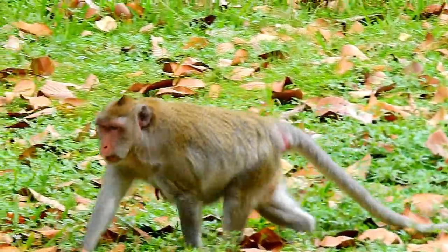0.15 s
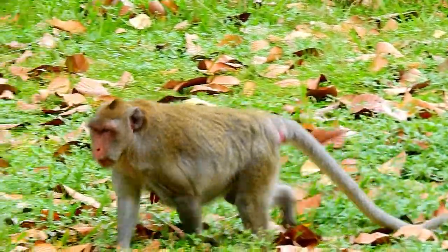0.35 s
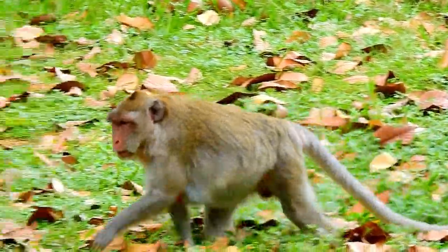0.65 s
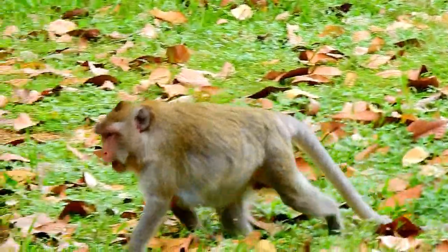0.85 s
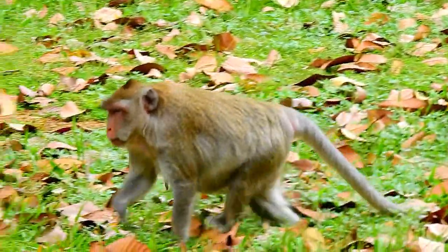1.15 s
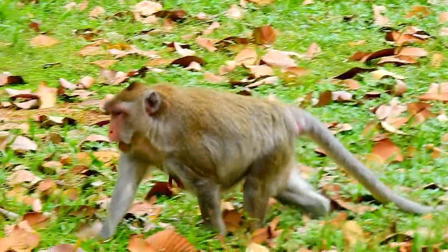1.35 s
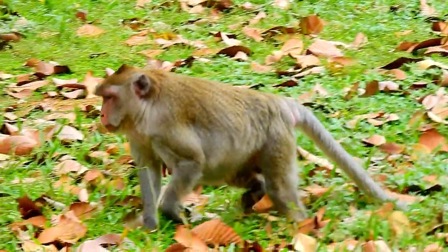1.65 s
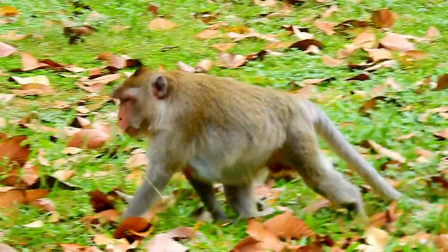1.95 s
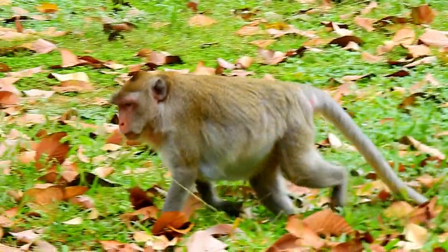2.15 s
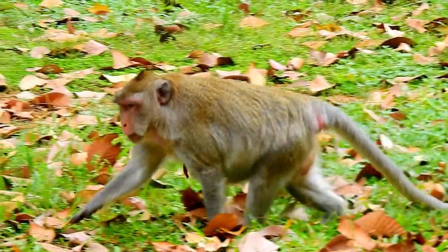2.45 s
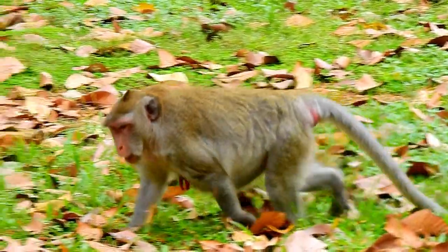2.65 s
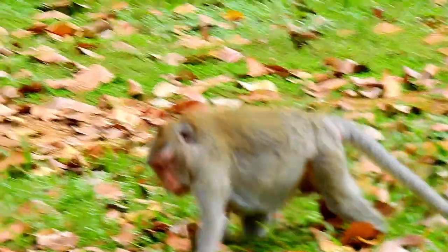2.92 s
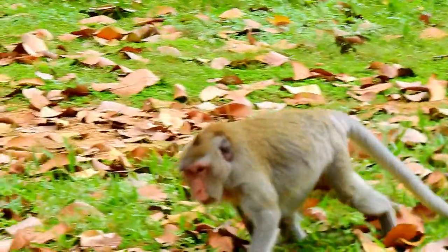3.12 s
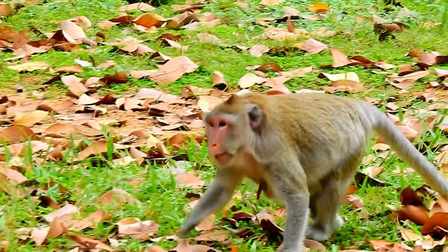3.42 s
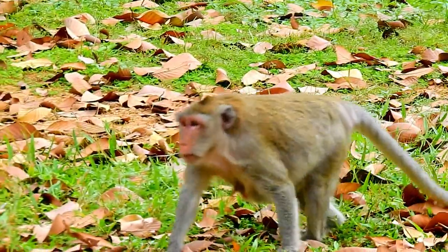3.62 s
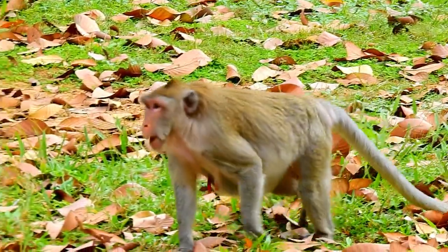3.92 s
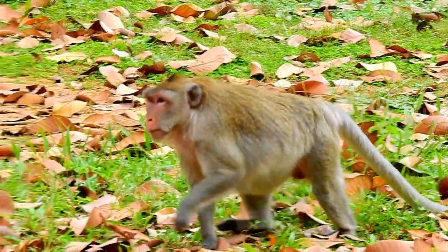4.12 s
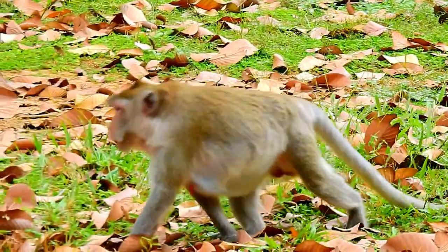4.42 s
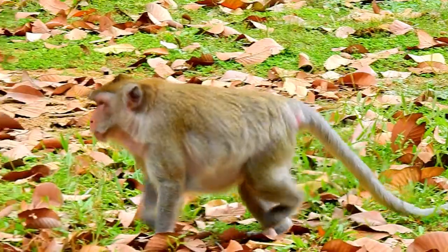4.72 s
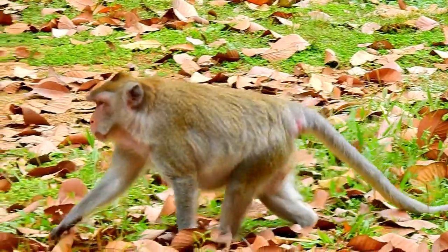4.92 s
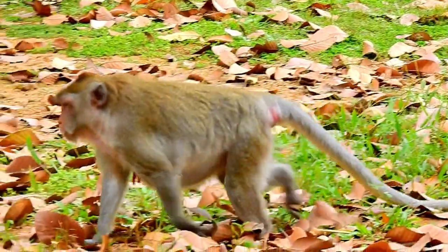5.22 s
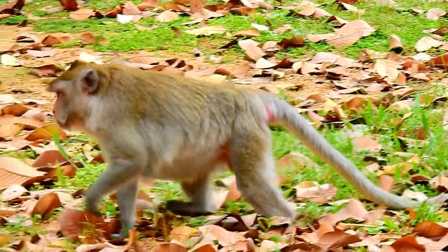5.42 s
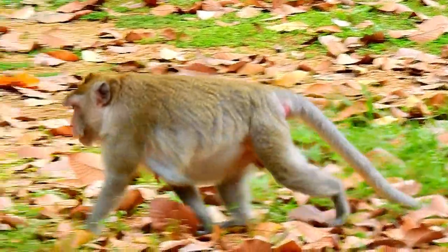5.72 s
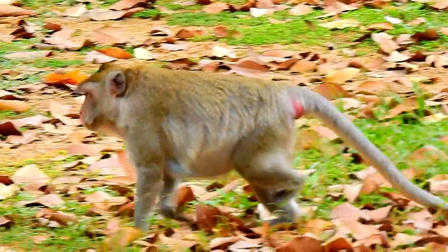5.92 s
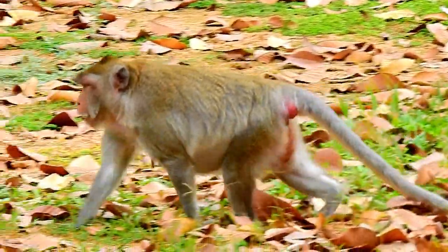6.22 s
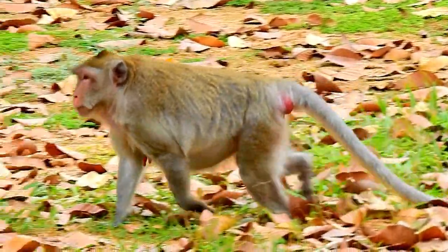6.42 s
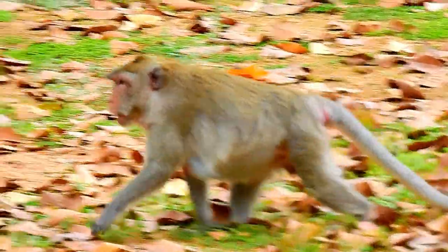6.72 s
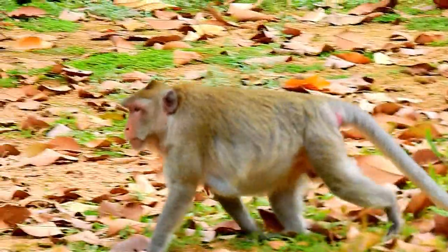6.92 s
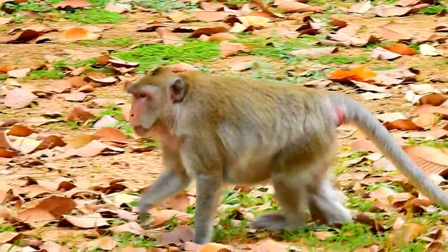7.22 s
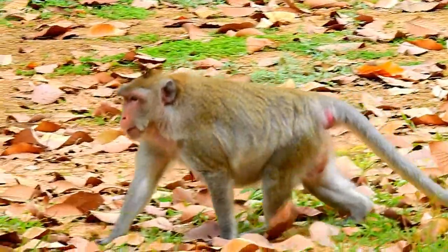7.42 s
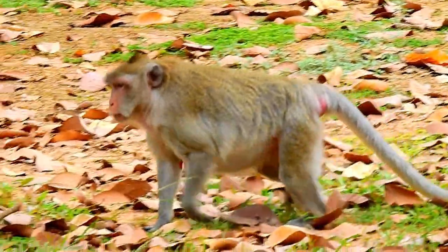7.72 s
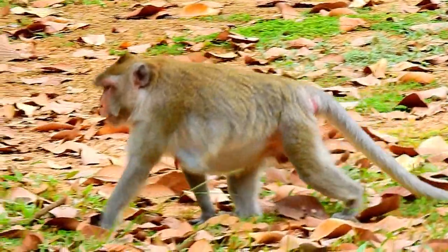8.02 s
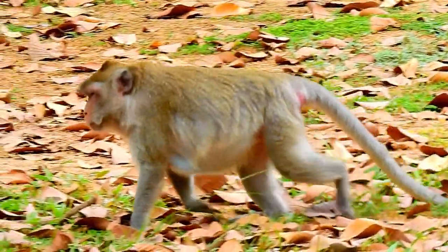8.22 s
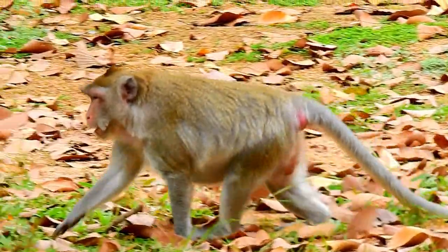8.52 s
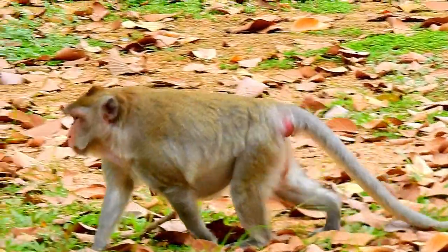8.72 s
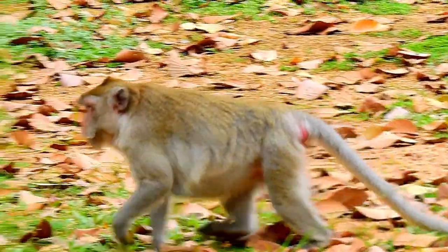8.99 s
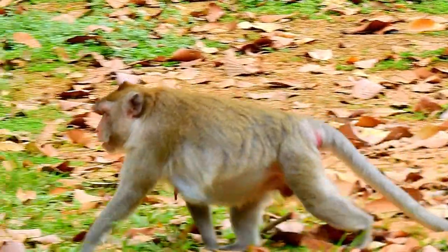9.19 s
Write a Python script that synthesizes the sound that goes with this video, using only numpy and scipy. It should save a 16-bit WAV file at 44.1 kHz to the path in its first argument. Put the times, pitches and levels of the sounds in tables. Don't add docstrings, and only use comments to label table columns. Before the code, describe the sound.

Short high animal calls and a hoarse chattering crowd ring among trees, leaving one spaced far caller before a small puttering motor passes by.

```python
import sys
import numpy as np
from scipy import signal
from scipy.fft import rfft, irfft, next_fast_len
from scipy.io import wavfile
from scipy.ndimage import uniform_filter1d

SR = 44100
rng = np.random.default_rng(int(sys.argv[2]) if len(sys.argv) > 2 else 0)


def volts(x):
    e = np.asarray(x, float) / 20
    return 10 ** e


def wav_record(signal):
    frames = np.transpose(np.atleast_2d(signal))
    bounded = np.clip(frames, -1, 1)
    quanta = np.round(bounded * 32767).astype(np.int16)
    wavfile.write(sys.argv[1], SR, quanta)


N = 412335

# pitch in Hz, level in dB per Hz.
AIR_SPECTRUM = [(15, -32), (25, -24), (54, -18), (102, -7), (183, -12), (265, -18), (709, -19.5),
                (907, -15), (2040, -14), (2810, -22), (3780, -19), (5200, -20.5), (8940, -36.5),
                (11600, -75), (19700, -120)]
# pitch in Hz, likeness from -1 to 1.
AIR_LIKENESS = [(60, 1), (210, 1), (710, 1), (2460, 0.78), (8490, 0.12)]
# pitch in Hz, left minus right in dB.
AIR_BALANCE = [(60, -1), (210, 0.5), (710, 2), (2460, 4.5), (8490, 1)]
# time in seconds, level in dB.
TRAFFIC_LEVEL = [
    (0, -91.5),
    (.7, -83),
    (3, -80),
    (3.3, -78),
    (4.3, -80),
    (4.7, -73),
    (5, -76.5),
    (5.8, -84),
    (6.5, -87),
]
# time in seconds, level in dB.
GUSTS = [(0, 0.5), (4.3, 2), (4.598, -1.5), (4.95, -12), (5.2, 1), (5.35, -8), (5.552, 0), (5.7, -5.5),
         (6.0, -3), (6.35, -4), (7, 2), (9.35, 7)]
LEAVES_DB, TRAFFIC_TOP_HZ = -80, 1100

# start in seconds, length in seconds, effort in dB,
# place of the peak from 0 to 1.
NEAR_CALLS = [
    [(.258, 0.22, -39.5, 0.55), (.715, 0.23, -29, 0.19), (1.13, 0.2, -35, 0.3)],
    [(.452, 0.082, -35, 0.4), (.52, .072, -32.5, 0.45), (.59, 0.15, -38.5, 0.54)],
    [(1.41, 0.23, -37, 0.21), (1.75, 0.22, -33.5, 0), (2.08, 0.17, -37, 0.34), (2.265, 0.23, -41, 1),
     (2.44, 0.2, -47, 0.2)],
    [(2.78, .32, -45.5, 0.38), (3.105, .26, -34.5, 0.37), (3.51, 0.28, -36, 0.33), (3.94, 0.24, -39, 0.59),
     (4.41, 0.23, -44.5, 0.15)],
    [(6.423, 0.275, -43, 0.4)],
]
# low partials in dB, left minus right in dB, echo in dB,
# mouth resonance in Hz, its strength in dB.
NEAR_VOICES = [(2, -16, -10.5, 6030, 3.5), (-2, -16, -6, 6150, 3.5), (4, -31.5, -28, 4740, 9),
               (0.5, -21.5, -6, 4420, -9), (3.5, 19, -2.5, 8300, 5.5)]
NEAR_WEAK_DB = [-6, -3, -16, -15, -12]
NEAR_STARTS_DB = [-14.5, -7.5, -6, -10.5, -5.5]
NEAR_ENDS_DB = [-8, -8, -4, -5.5, -4.5]
NEAR_ROUGHNESS = [
    [.45, .3, .45],
    [.3, .28, .42],
    [.15, .15, .15, .4, .4],
    [.55, .26, .28, .28, .3],
    [.26],
]
# time in seconds, pitch in Hz.
FIRST_PITCH = [
    [(0.27, 756), (0.302, 820), (0.314, 862), (0.36, 861), (0.392, 852), (0.432, 868), (0.44, 874),
     (0.46, 862.5)],
    [(0.725, 739.1), (0.759, 839), (0.791, 797.6), (0.803, 839), (0.819, 802), (0.861, 856), (0.887, 790),
     (0.91, 800)],
    [(1.14, 848), (1.202, 865.8), (1.208, 887), (1.268, 835), (1.28, 885), (1.3, 853), (1.312, 807),
     (1.34, 800)],
]
SECOND_PITCH = [
    [(0.46, 777), (0.478, 873), (0.51, 846.9), (0.52, 863), (0.535, 830)],
    [(0.525, 846), (0.535, 832.7), (0.543, 845), (0.557, 897), (0.585, 756)],
    [(0.6, 834), (0.624, 878), (0.634, 855), (0.702, 858), (0.72, 853)],
]
THIRD_PITCH = [
    [(1.42, 725.3), (1.452, 854.5), (1.46, 866.9), (1.486, 877), (1.502, 855), (1.55, 878), (1.585, 811)],
    [(1.76, 799.4), (1.774, 803), (1.79, 864), (1.854, 857), (1.864, 882), (1.904, 808), (1.92, 856)],
    [(2.09, 782), (2.13, 871), (2.164, 828), (2.178, 868), (2.21, 840), (2.222, 859), (2.23, 840)],
    [(2.28, 782), (2.32, 881.8), (2.352, 908), (2.37, 870), (2.402, 857.3), (2.444, 905), (2.46, 886)],
    [(2.45, 892.5), (2.47, 836), (2.542, 844.3), (2.584, 798), (2.598, 830), (2.616, 786), (2.63, 790)],
]
FOURTH_PITCH = [
    [(2.79, 699), (2.828, 824), (2.836, 836), (2.848, 808), (2.928, 826), (2.946, 802), (2.96, 809.5),
     (3.066, 795), (3.1, 750)],
    [(3.12, 695), (3.144, 717), (3.18, 790), (3.234, 806), (3.242, 790.0), (3.27, 815), (3.316, 783),
     (3.336, 709), (3.35, 690)],
    [(3.52, 689), (3.53, 676.6), (3.586, 747), (3.61, 799.5), (3.632, 761), (3.662, 799), (3.718, 816),
     (3.764, 671), (3.78, 682.5)],
    [(3.95, 635), (3.956, 627), (3.97, 702), (4.024, 775.5), (4.05, 754), (4.068, 783), (4.132, 753),
     (4.152, 715), (4.17, 684)],
    [(4.41, 681), (4.466, 758), (4.488, 747), (4.518, 763.1), (4.548, 762), (4.57, 767), (4.59, 724),
     (4.614, 708), (4.63, 660)],
]
FIFTH_PITCH = [
    [(6.43, 774), (6.444, 804), (6.51, 913), (6.53, 902), (6.6, 911), (6.658, 831), (6.688, 760),
     (6.7, 737.0)],
]
NEAR_QUIVER, NEAR_BEND = .002, 1.32
ROUGH_ENDS = .17

# pitch in Hz, level in dB.
THROAT_COLOUR = [(700, -24.5), (1600, -6), (2500, 2), (2900, -6.5), (3350, -1), (3680, 1), (3880, 4.5),
                 (4200, -5), (5100, -1.5), (5800, -4), (6600, -2), (7800, -10), (9000, -19), (10000, -19)]
NEAR_TOP_DB, FAR_TOP_DB = -11.5, -2
NEAR_AIR_DB, FAR_AIR_DB, CROWD_AIR_DB = -23, -45, -44

# time in seconds, effort in dB.
CROWD_EFFORT = [(.7, -27), (.8, -43), (.95, -40), (1.1, -41), (1.2, -35), (1.3, -37), (1.44, -39.5),
                (1.58, -39.5), (1.7, -36.5), (1.85, -34.5), (1.95, -43), (2.05, -41.5), (2.25, -43.5),
                (2.4, -42), (2.57, -40.5), (2.701, -66)]
# pitch in Hz, calls a second, left minus right in dB.
CROWD_VOICES = [(849, 3.1, -18.5), (929, 2.6, 6), (784, 3.6, -17)]
CROWD_ROUGH = .42

# pitch in Hz, share of the left-right difference the microphone hears.
PORT_SPREAD = [(500, 0.069), (2000, 0.12), (4000, 0.12), (8000, 0.6)]
# pitch in Hz, turn in radians.
PORT_LAG = [(2000, 0), (5500, .15), (7500, .6), (8800, 1.9)]
# pitch in Hz, time to fall by 60 dB in seconds.
TREE_RINGING = [(1000, 0.34), (4000, 0.5), (9000, 0.34)]

# start in seconds, length in seconds, pitch in Hz, level in dB.
HOOTS = [
    (2.62, .4, 595, -79),
    (5.1, .42, 595, -76),
    (3.25, .6, 395, -80),
    (4.4, 1.2, 400, -82),
]

# start in seconds, length in seconds, effort in dB,
# place of the peak from 0 to 1.
FAR_CALLS = [(2.637, 0.16, -43.5, 0.54), (3.363, 0.24, -42, 0.24), (3.728, 0.22, -37, 0.11),
             (4.389, 0.064, -44, 0.1), (4.669, 0.21, -49.5, 0.46), (5.027, 0.2, -47, 0.57),
             (5.38, 0.23, -49, 0.45), (5.723, 0.21, -44, 0.6), (6.045, 0.3, -49.5, 0.32),
             (6.435, 0.23, -40, 0.41), (6.752, 0.28, -46.5, 0.31), (7.147, .26, -43, 0.51),
             (7.489, 0.26, -48.5, 0.47), (7.876, 0.27, -45, 0.39), (8.236, 0.32, -44, 0.72),
             (8.611, 0.2, -39.5, 0.73), (8.978, 0.31, -45.5, 0.34)]
# first note in Hz, second note in Hz, low partials in dB, left minus right in dB,
# mouth resonance in dB.
FAR_VOICES = [(810, 640, 1.5, -8, -21), (800, 640, -2, -11, -13), (790, 830, -1, -6, -7),
              (1050, 1050, 7, -12, 12), (910, 920, 2, -10, 0), (1070, 850, -4, -14, 2),
              (1050, 650, -13, -17, -6), (1110, 750, 2, -14, 1), (1053, 820, -5, -12, -5.5),
              (1053, 820, 5, 5, 8), (863, 830, 4, -7, 0), (850, 795, 5, -14, 1), (750, 800, 7, -12, 3),
              (783, 830, 1.5, -10, -6), (790, 770, 1, -14, -4), (830, 810, -1, -19, 2),
              (858, 880, 0, -7, 4)]
FAR_BREAKS = [.07, .074, .074, .074, .074, .08, .075, .08, .07, .074, .074, .074, .16, .08, .16, .08, .1]
FAR_ROUGHNESS = [.75, .75, .62, .42, .5, .42, .6, .45, .52, .6, .75, .48, .62, .42, .55, .52, .7]
FAR_MOUTHS = [5300, 6550, 5100, 6250, 5840, 5370, 5400, 5160, 6300, 6470, 5960, 6270, 6900, 6560, 6300,
              6530, 6700]
FAR_WEAK_DB, FAR_ECHO_DB = -9, -2.5
FAR_START_DB, FAR_END_DB, FAR_BEND, FAR_FLUTTER_DB = -13, -22, 1.6, 2.5
FAR_SAG = .035

# time in seconds, nearness in dB, exhaust turned this way in dB,
# left minus right in dB.
ENGINE_PATH = [(4.9, -92, 40.5, 10), (5.5, -64, -14, 6), (6, -79.5, 5, 12.5), (6.201, -71.5, 5, 2),
               (6.398, -75.5, 0, 18), (7.1, -68, 2, 16), (7.6, -64, 5.5, 15.5), (7.9, -55, -2.5, 10.5),
               (8.38, -55.5, 3, 16.5), (8.55, -52.5, 1, 13), (8.76, -48, -4, 9.5), (8.962, -51, 7, 3.5),
               (9.029, -49.5, 9, 3), (9.13, -43.5, 1, -3.5), (9.26, -52, 6, -7), (9.35, -54.5, 4, -4.5)]
# time in seconds, firings a second.
FIRING_RATE = [
    (6.6, 36.4),
    (7.88, 37.5),
    (7.98, 37.6),
    (8.67, 37.7),
    (9.23, 37.1),
    (9.35, 37.1),
]
# pitch in Hz, level in dB.
EXHAUST_COLOUR = [(29, -41), (50, -8), (70, -6), (118, -9), (182, -1.5), (231, -2), (259, -3.5), (450, -3),
                  (680, -8), (980, -19), (1650, -120)]
# pitch in Hz, width in Hz, level in dB.
PIPE_RING = [(826, 204, 5.5), (1142, 292, 12.5)]
# pitch in Hz, width in Hz, level in dB.
WHINE_RING = [(1620, 980, 30.5), (2440, 380, 30.8), (2836, 340, 25.5)]
# pitch in Hz, width in Hz, level in dB.
HISS_RING = [(4510, 2750, 19), (6530, 1860, 24.5)]
# time in seconds, pitch in Hz, level in dB.
GROUND_LOW_BAND = [(6.5, 650, -1), (7.6, 610, -1), (8.0, 680, 5), (8.6, 445, -4.5), (8.78, 564, -13),
                   (8.93, 765, -6), (9.01, 700, -7), (9.05, 850, 5), (9.25, 850, 7), (9.29, 800, 3),
                   (9.35, 700, 2)]
# time in seconds, pitch in Hz, level in dB.
GROUND_HIGH_BAND = [(7.4, 1810, -15), (7.8, 1800, -5.5), (8.5, 1880, -2), (8.8, 1900, -2.5),
                    (8.97, 1710, -4), (9.1, 1935, 0), (9.2, 2170, -6.5), (9.35, 1870, -1)]
GROUND_WIDE = 0.32
RETURN_SHARE = 0.5
SPREAD_S, SPREAD_HZ = .022, 300
PIPE_DB, WHINE_DB, HISS_DB = 0.5, 4.5, -26
PASS_S, SHADE_S, PIPE_SHADE_DB, WHINE_SHADE_DB, HISS_SHADE_DB = 8.51, 0.022, -0.5, -9, 8.5

# time in seconds, pitch in Hz, level in dB, left minus right in dB.
TWIGS = [
    (5.447, 5600, -47, -6),
    (5.54, 5300, -54, -6),
    (5.54, 6500, -54, -6),
    (5.853, 6500, -48, -6),
]
# time in seconds, level in dB, pitch in Hz, left minus right in dB.
STONES = [
    (7.7613, -49, 1170, 16),
    (7.8301, -38, 2010, 20),
    (8.1459, -42, 2470, 16.0),
    (8.2088, -38, 2440, 17.0),
    (8.3416, -32, 1660, 7),
    (8.3994, -36, 1050, 6.5),
    (8.624, -35, 1170, 8),
    (9.081, -31, 1110, -5),
]

# pitch in Hz, level in dB.
MIC_BODY = [(20, -18), (65, 0), (3550, 0), (3780, -14), (4100, 0)]
# pitch in Hz, level in dB.
TREBLE_DIPS = [(8700, 0), (9500, -2), (9900, -9), (10500, 6), (11300, 4), (12200, -12), (13600, -13),
               (14500, -4), (15300, -12)]


def evened(x):
    return x / np.sqrt(np.mean(x ** 2) + 1e-20)


def read(points, hz):
    f, value = np.transpose(points)
    return np.interp(np.log(hz + 1), np.log(f + 1), value)


def drift(count, seconds):
    size = max(round(seconds * SR), 1)
    return evened(uniform_filter1d(uniform_filter1d(rng.standard_normal(count), size), size))


def sides(difference):
    return np.array([[.5], [-.5]]) * difference


def lay(out, start, sound):
    part = out[..., round(start * SR):][..., :sound.shape[-1]]
    part += sound[..., :part.shape[-1]]


def colour(x, points, lean_db=0):
    size = next_fast_len(len(x) + 512)
    hz = np.fft.rfftfreq(size, 1 / SR)
    lean = volts(sides(lean_db) * read(PORT_SPREAD, hz))
    lag = np.exp(1j * sides(np.sign(lean_db)) * read(PORT_LAG, hz))
    return irfft(rfft(x, size) * volts(read(points, hz)) * lean * lag, size)[:, :len(x)]


def resonate(x, modes):
    out = 0
    for k, (hz, width, db) in enumerate(modes):
        b, a = signal.iirpeak(hz, hz / width, SR)
        ring = signal.lfilter(b, a, signal.lfilter(b, a, x))
        out = out + (-1) ** k * volts(db) * ring
    return evened(out)


def air():
    frames, hz = N // 256 + 5, np.fft.rfftfreq(1024, 1 / SR)
    a, b, c, d, patches = rng.standard_normal((frames, 513, 5)).T
    patches = evened(uniform_filter1d(uniform_filter1d(patches, 8, 0), 20, 1))
    same = np.clip(read(AIR_LIKENESS, hz), -1, 1)[:, None]
    left = a + 1j * b
    right = same * left + np.sqrt(1 - same ** 2) * (c + 1j * d)
    balance_db = sides(read(AIR_BALANCE, hz))[:, :, None]
    z = np.array([left, right]) * volts(read(AIR_SPECTRUM, hz)[:, None] + 2.0 * patches + balance_db)
    level = np.sqrt(np.mean(signal.istft(z, nperseg=1024, noverlap=768)[1] ** 2))
    when = np.arange(frames) * 256 / SR
    traffic_db = np.interp(when, *np.transpose(TRAFFIC_LEVEL)) - LEAVES_DB
    breeze_db = np.interp(when, *np.transpose(GUSTS))
    low = 1 / (1 + (hz[:, None] / TRAFFIC_TOP_HZ) ** 2)
    z *= volts(low * traffic_db + (1 - low) * breeze_db)
    return volts(LEAVES_DB + 13.0) / level * signal.istft(z, nperseg=1024, noverlap=768)[1][:, :N]


def swell(length, peak, start_db, end_db, bend, edge):
    t = np.arange(0, length, 1 / SR)
    away = np.interp(t / length, [0, np.clip(peak, .05, .95), 1], [-1, 0, 1])
    effort_db = np.where(away < 0, start_db, end_db) * abs(away) ** bend
    return t, volts(effort_db) * signal.windows.tukey(len(t), edge)


def voice(hz, rough, low_db, weak_db, lean_db, mouth_hz=5000, mouth_db=0, top_db=NEAR_TOP_DB,
          air_db=NEAR_AIR_DB):
    count = len(hz)
    waver = .022 * rough * drift(count, .015) + .08 * rough ** 2 * drift(count, .003)
    turns = np.cumsum(hz * (1 + waver)) / SR
    steps = np.arange(0, count + 400, 400)
    flicker = uniform_filter1d(rng.standard_normal((18, len(steps))), 3, axis=1)
    flicker_db = (1 + 8 * np.mean(rough)) * flicker
    folds = 0
    for k in range(1, 18):
        db = low_db * (k * hz < 3750) + top_db * max(k - 10, 0)
        db = db + weak_db * ((k in (5, 7)) + .4 * (k == 3))
        db = db - np.maximum(3300 - k * hz, 0) / 125
        db = db + np.interp(np.arange(count), steps, flicker_db[k])
        folds = folds + volts(db) * np.cos(2 * np.pi * (k * turns + rng.random()))
    folds *= volts(2.54 * drift(count, 0.00049))
    puffs = (0.17 + np.exp(-(turns % 1) / 1.4)) * rng.standard_normal(count)
    drive = evened(folds) + .7 * rough * evened(puffs)
    drive += volts(mouth_db) * signal.lfilter(*signal.iirpeak(mouth_hz, 6.0, SR), drive)
    return evened(colour(drive, THROAT_COLOUR + [(12000, air_db)], lean_db))


def call_out(mix, start, sound, echo_db):
    lay(mix[:2], start, sound)
    lay(mix[2:], start, volts(echo_db) * sound)


def near_calls():
    mix = np.zeros((4, N))
    pitches = FIRST_PITCH, SECOND_PITCH, THIRD_PITCH, FOURTH_PITCH, FIFTH_PITCH
    callers = zip(NEAR_CALLS, pitches, NEAR_ROUGHNESS, NEAR_WEAK_DB, NEAR_VOICES, NEAR_STARTS_DB, NEAR_ENDS_DB)
    for calls, curves, roughs, weak_db, place, start_db, end_db in callers:
        low_db, lean_db, echo_db, *mouth = place
        for (start, length, db, peak), curve, rough in zip(calls, curves, roughs):
            t, shape = swell(length, peak, start_db, end_db, NEAR_BEND, .26)
            hz = uniform_filter1d(np.interp(start + t, *np.transpose(curve)), 300)
            hz = hz * (1 + NEAR_QUIVER * drift(len(t), 0.012))
            rough = rough + ROUGH_ENDS * (1 - shape)
            sound = voice(hz, rough, low_db, weak_db, lean_db, *mouth)
            call_out(mix, start, volts(db) * shape * sound, echo_db)
    return mix


def trees(x):
    taps = np.zeros((3, SR // 2))
    at = np.arange(60, SR // 2 - 20, 20)
    places = at + rng.integers(0, 20, (3, len(at)))
    np.put_along_axis(taps, places, rng.choice([-1., 1.], (3, len(at))), 1)
    hz, t, z = signal.stft(taps[:2] + 1.13 * taps[2], SR, nperseg=256)
    fall = volts(-60 * t / read(TREE_RINGING, hz)[:, None])
    tail = signal.istft(z * fall, SR, nperseg=256)[1]
    return signal.fftconvolve(x, tail / np.linalg.norm(tail[0]), axes=1)[:, :N]


def hoarse_crowd():
    mix = np.zeros((4, N))
    s, db = np.transpose(CROWD_EFFORT)
    t = np.arange(s[0], s[-1], 1 / SR)
    shape = volts(np.interp(t, s, db) - 5.0) * signal.windows.tukey(len(t), .04)
    for hz, beat, lean_db in CROWD_VOICES:
        arch = abs(np.sin(np.pi * (beat * t + rng.random()))) ** .4
        pitch = hz * (.82 + .2 * arch + 0.04 * drift(len(t), .04))
        sound = voice(pitch, CROWD_ROUGH, 1.0, -10.5, lean_db, 3020, -12.0, NEAR_TOP_DB, CROWD_AIR_DB)
        call_out(mix, s[0], shape * arch * sound, 0.5)
    return mix


def hoots():
    out = np.zeros(N)
    for start, length, hz, db in HOOTS:
        t = np.arange(round(length * SR)) / SR
        lay(out, start, volts(db) * np.sin(2 * np.pi * hz * t) * signal.windows.tukey(len(t), .4))
    return out


def far_caller():
    mix = np.zeros((4, N))
    rows = zip(FAR_CALLS, FAR_VOICES, FAR_BREAKS, FAR_ROUGHNESS, FAR_MOUTHS)
    for (start, length, db, peak), notes, at, rough, mouth_hz in rows:
        first_hz, second_hz, low_db, lean_db, mouth_db = notes
        t, shape = swell(length, peak, FAR_START_DB, FAR_END_DB, FAR_BEND, .15)
        hz = np.interp(t, [at, at + .004], [first_hz, second_hz])
        shape = shape * (1 - .6 * np.exp(-((t - at) / .006) ** 2))
        hz *= 1 + .015 * drift(len(t), 0.0287) - FAR_SAG * (1 - shape)
        shape = shape * volts(db - 5.0 + FAR_FLUTTER_DB * drift(len(t), 0.018))
        sound = voice(hz, rough, low_db, FAR_WEAK_DB, lean_db, mouth_hz, mouth_db, FAR_TOP_DB, FAR_AIR_DB)
        call_out(mix, start, shape * sound, FAR_ECHO_DB)
    return mix


def exhaust_bangs(turns):
    bangs = np.diff(np.floor(turns), prepend=0) * volts(0.5 * rng.standard_normal(N))
    bangs = bangs - RETURN_SHARE * np.roll(bangs, round(SR / 37.4 / 3))
    late = SPREAD_S * SPREAD_HZ * np.log(1 + np.fft.rfftfreq(N, 1 / SR) / SPREAD_HZ)
    return evened(irfft(rfft(bangs) * np.exp(-2j * np.pi * late), N))


def ground(x):
    hz, when, z = signal.stft(x, SR, nperseg=1024)
    echo_db = 0
    for s, band_hz, band_db in map(np.transpose, (GROUND_LOW_BAND, GROUND_HIGH_BAND)):
        away = np.log2((hz[:, None] + 1) / np.interp(when, s, band_hz)) / GROUND_WIDE
        echo_db = echo_db + np.interp(when, s, band_db) * np.exp(-away ** 2)
    return signal.istft(z * volts(echo_db), SR, nperseg=1024)[1][:, :N]


def engine():
    s, *columns = np.transpose(ENGINE_PATH)
    t = np.arange(N) / SR
    near_db, facing_db, lean_db = (np.interp(t, s, c) for c in columns)
    lean = sides(lean_db)
    shade = 1 / (1 + np.exp((PASS_S - t) / SHADE_S))
    exhaust_db = near_db + facing_db
    pipe_db = near_db + PIPE_DB + PIPE_SHADE_DB * shade
    whine_db = near_db + WHINE_DB + WHINE_SHADE_DB * shade
    hiss_db = near_db + HISS_DB + HISS_SHADE_DB * shade
    turns = np.cumsum(np.interp(t, *np.transpose(FIRING_RATE))) / SR
    bangs = exhaust_bangs(turns)
    puff = (4.2 + np.exp(-(turns % 1) / 0.58)) * rng.standard_normal((4, N))
    thump = evened(colour(bangs + 0.2 * puff[3], EXHAUST_COLOUR)[0])
    ring = resonate(0.8 * bangs + puff[0], PIPE_RING) + 0.5 * resonate(puff[2:], PIPE_RING)
    whine = resonate(puff[1] + puff[2:], WHINE_RING)
    hiss = resonate(puff[0] + 2.0 * puff[2:], HISS_RING)
    close = np.clip(t - 6.8, 0, 1)
    total = volts(exhaust_db + 0.19 * lean) * thump
    total += volts(pipe_db + 0.8 * lean) * ring
    total += volts(whine_db + 1.36 * lean) * whine
    total += close * volts(hiss_db + 4.2 * lean + 2.6 * drift(N, 0.065)) * hiss
    fade = np.clip((t - s[0]) / 1.05, 0, 1)
    return ground(fade * total)


def twigs_and_stones():
    out, t = np.zeros((2, N)), np.arange(1300) / SR
    for start, hz, db, lean_db in TWIGS:
        crack = resonate(rng.standard_normal(len(t)), [(hz, 800, 0)])
        crack = crack * volts(db - 60 * t / .07) * np.minimum(t / .004, 1)
        lay(out, start, crack * volts(sides(lean_db)))
    for start, db, hz, lean_db in STONES:
        tick = np.cos(2 * np.pi * hz * t) * volts(db + 1.5 - 60 * t / 0.0083) * np.minimum(t / .001, 1)
        lay(out, start, tick * volts(sides(lean_db)))
    return out


def scene():
    calls = near_calls() + hoarse_crowd() + far_caller()
    return air() + calls[:2] + trees(calls[2:]) + hoots() + engine() + twigs_and_stones()


def roll_off(x):
    return signal.sosfilt(signal.butter(12, 15200, fs=SR, output="sos"), x)


def record(dry):
    hz = np.fft.rfftfreq(N, 1 / SR)
    mic_db = read(MIC_BODY, hz) + read(TREBLE_DIPS, hz)
    heard = irfft(rfft(dry) * volts(mic_db), N)
    return roll_off(heard)


dry = scene()
out = record(dry)
wav_record(out)
```